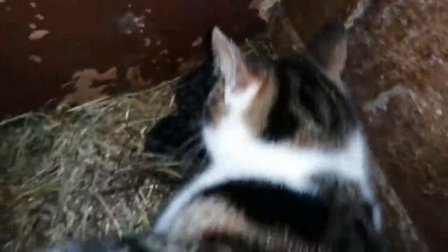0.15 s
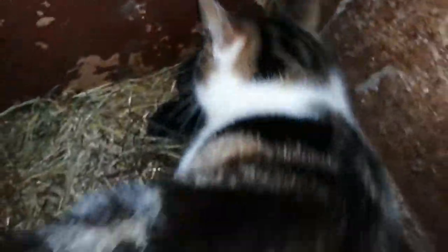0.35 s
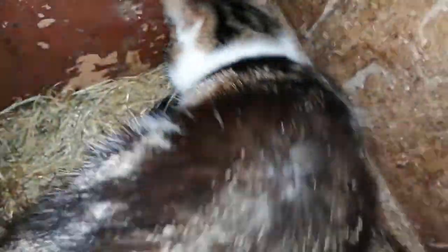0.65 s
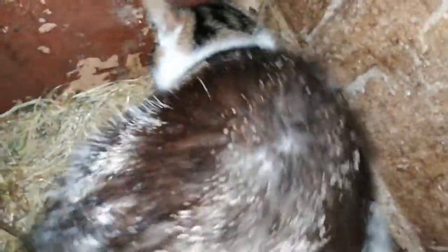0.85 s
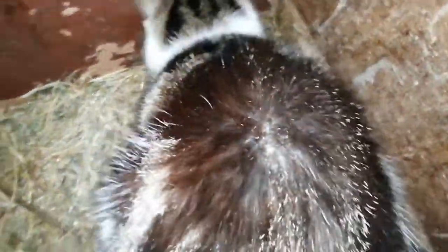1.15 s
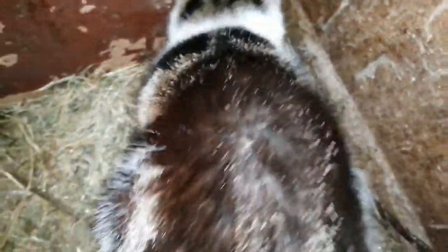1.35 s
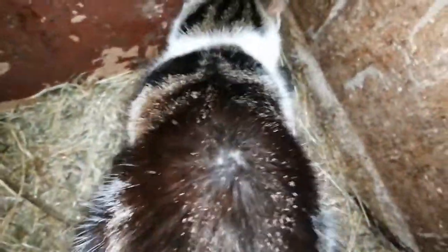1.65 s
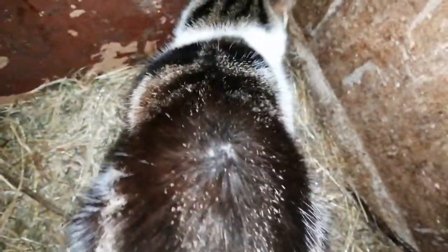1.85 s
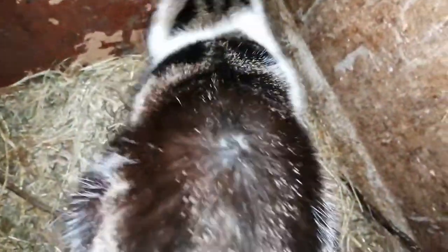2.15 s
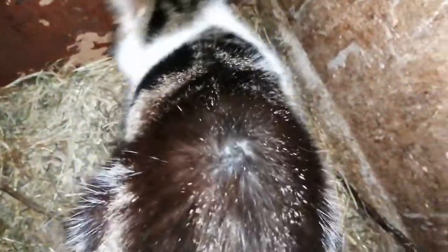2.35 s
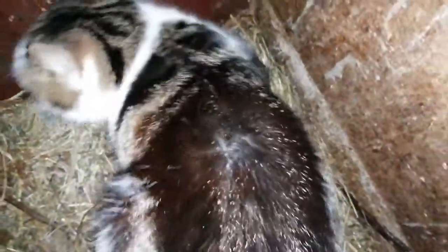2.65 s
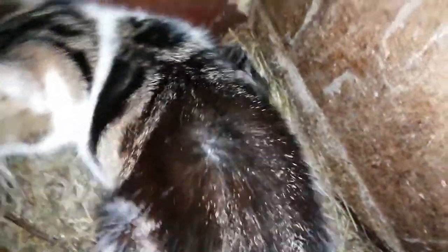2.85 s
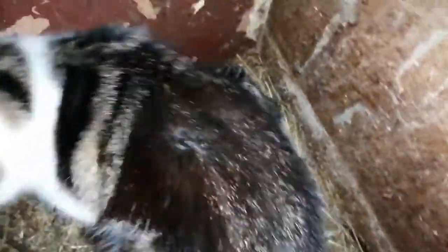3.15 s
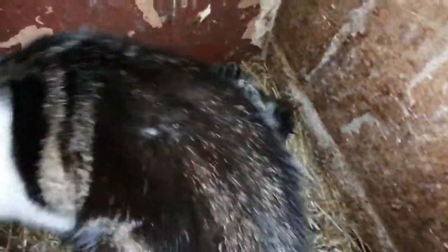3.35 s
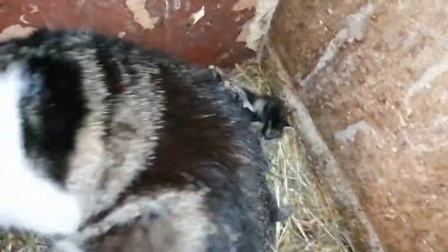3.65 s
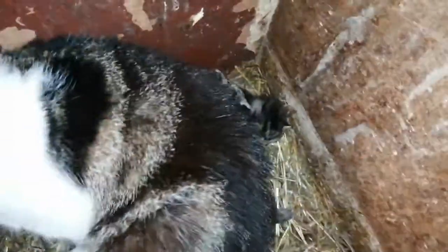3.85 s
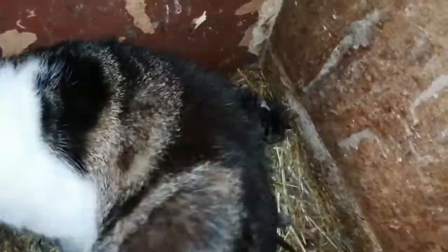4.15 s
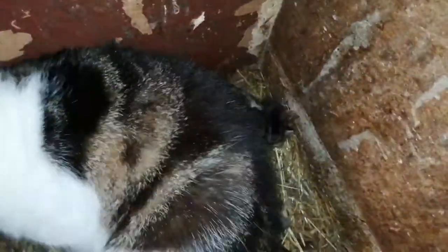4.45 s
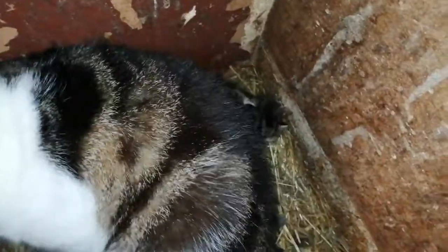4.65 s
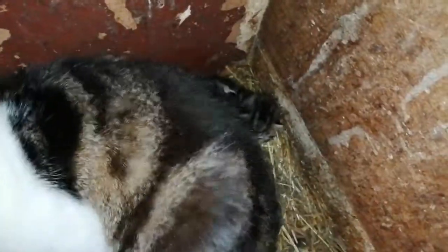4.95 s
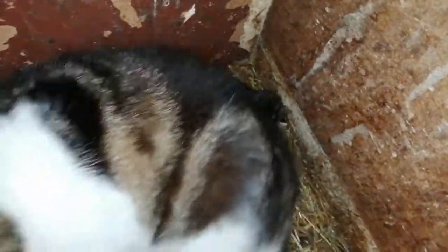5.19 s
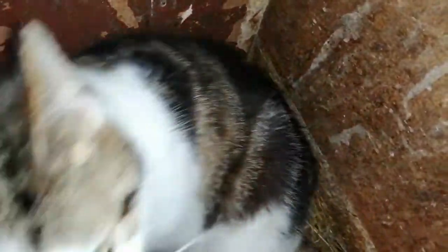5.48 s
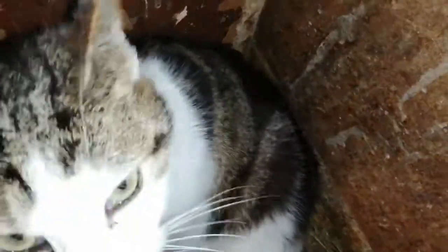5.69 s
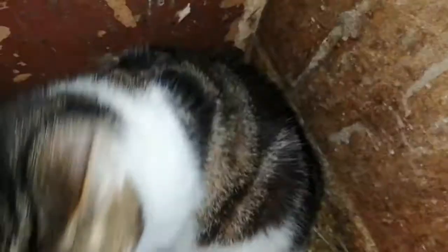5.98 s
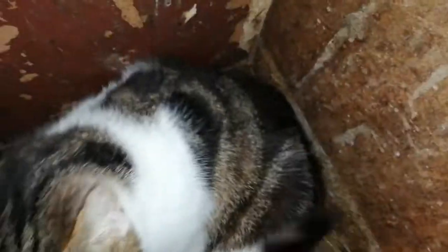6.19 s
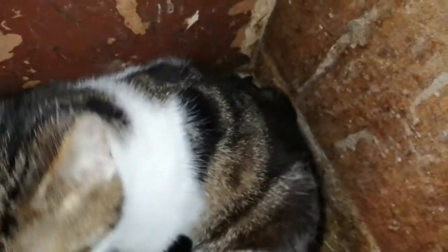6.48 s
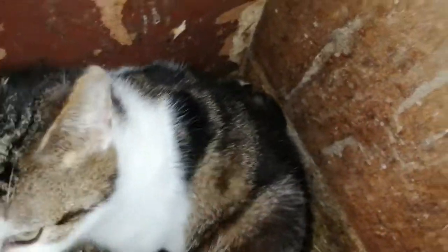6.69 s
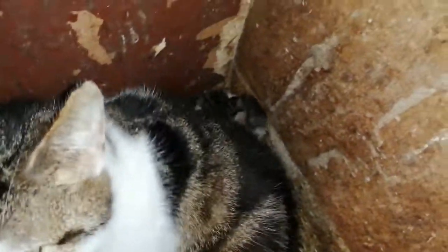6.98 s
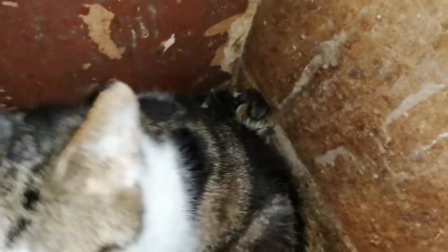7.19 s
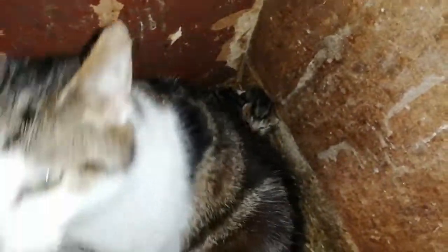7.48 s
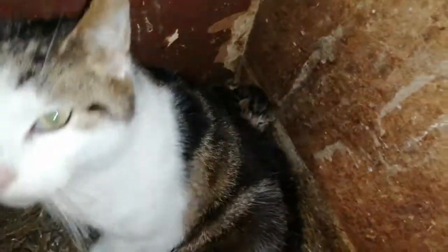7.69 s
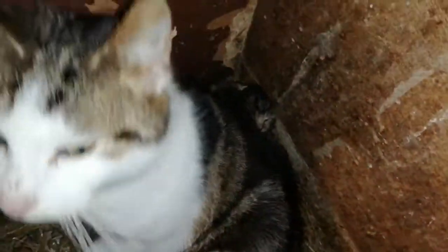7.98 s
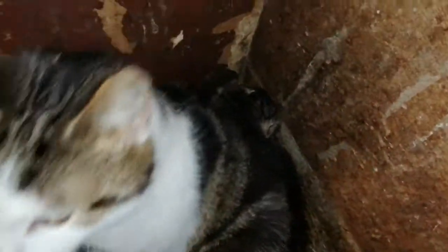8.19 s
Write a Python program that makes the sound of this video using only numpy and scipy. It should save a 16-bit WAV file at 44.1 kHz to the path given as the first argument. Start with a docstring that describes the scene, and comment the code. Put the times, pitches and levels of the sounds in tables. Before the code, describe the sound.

Close phone-like pickup in a straw-lined shed corner: soft continuous purring and crisp straw crackles first, then a cluster of shrill kitten mews, the loudest around three and a half seconds. Later mews are more spaced and gradually lower, with little rough squeaks, muffled body bumps and airy wheezes. The purr swells toward the end. Sound leans right at first, then becomes more balanced, with a very short stone reflection.

```python
"""Purring cat and mewing kittens

A mother cat purrs on straw in a stone shed, close to a phone, while her kittens mew over one another.
The purr is paired claps ringing chest and throat; each mew is a stack of partials on a gliding pitch.
Shaped noise makes the rustling, snapping straw, a faint band near 2.3 kHz, airy wheezes, hiss and rumble.
Bodies bump the ground as dull rings with low noise. The left channel starts quiet and fades up."""
import sys
import numpy as np
from scipy import signal
from scipy.fft import rfft, irfft, next_fast_len
from scipy.io import wavfile
from scipy.ndimage import uniform_filter1d

SR = 44100
rng = np.random.default_rng(int(sys.argv[2]) if len(sys.argv) > 2 else 0)


def waveform_to_disk(signal):
    """Save audio, clipped to [-1, 1], as 16-bit WAV at the path in sys.argv[1]."""
    frames = np.transpose(np.atleast_2d(signal))
    scaled = np.clip(frames, -1, 1) * 32767
    samples = np.round(scaled).astype(np.int16)
    wavfile.write(sys.argv[1], SR, samples)


N = 367353
TOP_HZ = 15850  # upper edge of the whole scene


def undb(db):
    """Turn decibels into an amplitude factor."""
    return 10 ** (np.asarray(db) / 20)


def unit(x):
    """Scale to an RMS of 1 over all channels together."""
    return x / np.sqrt(np.mean(x ** 2))


def band(x, hz, width):
    """Ring a resonance with gain 1 at its centre."""
    return signal.lfilter(*signal.iirpeak(hz, hz / width, fs=SR), x)


def colour(x, points):
    """Shape a spectrum through (Hz, dB) points, joined on a log frequency scale."""
    hz, db = np.transpose(points)
    size = next_fast_len(x.shape[-1])
    bin_hz = np.arange(size // 2 + 1) * SR / size
    gain = undb(np.interp(np.log(bin_hz + 1), np.log(hz), db))
    return irfft(rfft(x, size) * gain, size)[..., :x.shape[-1]]


def walk(count, size=N):
    """Wander between random levels, count of them a second, joined by straight slopes."""
    step = int(SR / count)
    levels = np.repeat(rng.standard_normal(size // step + 1), step)
    return 2.13 * uniform_filter1d(levels, step)[:size]


def sides(pan_db):
    """Left and right gains whose mean is 1, with left minus right given in dB."""
    return 2 * np.array([[undb(pan_db)], [1]]) / (1 + undb(pan_db))


def add(out, s, sound):
    """Mix a sound in at s seconds."""
    i = int(s * SR)
    out[:, i:i + sound.shape[1]] += sound[:, :N - i]


# Purring breaths, each lasting until the next.
# Each row: start in seconds, chest level in dB at the start and at the end, throat minus chest in dB.
BREATHS = [(0, -62.5, -71, -8), (1.15, -62.5, -59, -5), (1.68, -63.5, -66.5, -4), (2.6, -63, -65.5, -15),
           (3.431, -72, -56.5, -8.5), (4.15, -64.5, -59.5, -11.5), (5.38, -62.5, -63, -12),
           (6.059, -60, -56, -11.5), (7.319, -59, -67, -17), (7.72, -60, -53, -15.5),
           (8.17, -54, -53, -13.5)]
TURN_S, TURN_DB, ARCH_DB = 0.13, -7, 0.5  # the purr dips where the breath turns and swells in its middle


def breathing():
    """Chest level and throat-minus-chest level in dB as the breaths follow one another."""
    t = np.arange(N) / SR
    start, from_db, to_db, throat_db = np.transpose(BREATHS)
    end = np.append(start[1:], N / SR)
    breath = np.clip(np.searchsorted(start, t) - 1, 0, None)
    along = (t - start[breath]) / (end - start)[breath]
    chest_db = from_db[breath] + (to_db - from_db)[breath] * along + ARCH_DB * np.sin(np.pi * along)
    chest_db = chest_db + TURN_DB * sum(np.exp(-((t - s) / TURN_S) ** 2) for s in start[1:])
    # smooth the steps between breaths over 50 ms
    return [uniform_filter1d(db, size=SR // 20) for db in (chest_db, throat_db[breath])]


# Pulse rate of the purr. Each row: time in seconds, rate in Hz.
PURR_RATE = [(0, 27.61), (1.1, 27.78), (2.3, 29.22), (2.7, 28.22), (3.55, 28.6), (4.08, 29.43),
             (4.35, 28.19), (5.4, 30.07), (6.3, 28.62), (7.5, 30.5), (7.95, 29.54), (8.33, 28.07)]
REBOUND_MS = 7.83, 7.7  # mean delay of the second clap, at the start and at the end


def purr_claps():
    """The vocal folds clap once a cycle and rebound some 8 ms later, with uneven timing and force."""
    hz = np.interp(np.arange(N) / SR, *np.transpose(PURR_RATE))
    cycles = 0.3083 + np.cumsum(hz) / SR
    at = np.flatnonzero(np.diff(np.floor(cycles)))
    jitter, force, delay, rebound_force = rng.standard_normal((4, len(at)))
    at = np.abs(at + (0.0001 * SR * jitter).astype(int))
    rebound = np.linspace(*REBOUND_MS, len(at)) * (1 + 0.062 * delay) * SR / 1000
    claps = np.zeros(N + SR)
    claps[at] = undb(2.5 * force)
    claps[at + rebound.astype(int)] = undb(0.61 * rebound_force)
    # soft tissue: each clap lasts about 2 ms
    return np.convolve(claps, np.hanning(100))[:N]


# Body resonances; the first chest row rings at first, the second at last.
# Each row: centre in Hz, width in Hz, relative level in dB.
CHEST_RINGS = [(177.2, 128, 0), (130.6, 70, 0)]
THROAT_RINGS = [(402, 380, 0.7), (531, 250, 0)]


def purr():
    """The claps ring chest and throat, the chest crossfading from one resonance to the other."""
    claps = purr_claps()

    def ring(hz, width_hz, db):
        """Pass the claps twice through one resonance."""
        return undb(db) * unit(band(band(claps, hz, width_hz), hz, width_hz))

    fade = np.linspace(0, np.pi / 2, N)
    chest = np.cos(fade) * ring(*CHEST_RINGS[0]) + np.sin(fade) * ring(*CHEST_RINGS[1])
    throat = unit(sum(ring(*mode) for mode in THROAT_RINGS))
    chest_db, throat_db = breathing()
    return undb(chest_db) * (chest + undb(throat_db) * throat)


# Steady stirring of the straw. Each row: time in seconds, level in dB.
RUSTLE = [(0, -80), (2.5, -74.5), (4, -64), (8.33, -69)]
# A body shifts and the straw swells. Each row: time in seconds, level in dB.
SHUFFLES = [(0.034, -57), (.32, -67.5), (0.592, -62), (1.058, -59), (3.466, -51), (3.8, -69), (5.43, -54),
            (5.51, -66.5), (6.02, -56), (7.4, -56.5)]
# Colour of straw, for rubbing and snaps alike. Each row: frequency in Hz, relative level in dB.
STRAW_COLOUR = [(880, -67), (1500, -64), (2230, -9), (4300, -17), (6800, 2), (11000, -11), (14900, -3),
                (16000, -12)]


def straw():
    """Dense rubbing of stalks as grainy noise that swells when a body shifts, with stray ticks."""
    t = np.arange(N) / SR
    swell = undb(np.interp(t, *np.transpose(RUSTLE)))
    swell = swell + sum(undb(db) * np.exp(-((t - s) / 0.053) ** 2) for s, db in SHUFFLES)
    grain = rng.standard_normal((2, N)) * undb(1.51 * rng.exponential(size=(2, N)))
    flicker = undb(1.6 * walk(count=60))
    ticks = 0
    # about nine ticks a second ring in each band
    for hz in (5455, 7000, 9860, 14500):
        hits = (rng.random(N) < 9 / SR) * undb(21.5 + 10 * rng.random(N))
        ticks = ticks + band(hits, hz, hz / 3)
    ticks = ticks * [[.6], [1]]  # softer on the left
    return unit(colour(unit(grain) * flicker + ticks, STRAW_COLOUR)) * swell


# Steady hiss colour. Each row: frequency in Hz, relative level in dB.
HISS_COLOUR = [(450, -14), (750, -6), (3150, -8), (3900, -15.5), (6500, -11), (9000, -26), (13000, -23),
               (15000, -9.5)]
HISS_DB = -68
# Rumble. Each row: time in seconds, level in dB.
RUMBLE = [(0, -67), (3.799, -68), (5.2, -62), (8.33, -63.5)]


def air():
    """Steady hiss, unrelated left and right, over a wavering rumble that both sides mostly share."""
    hiss = unit(colour(rng.standard_normal((2, N)), HISS_COLOUR)) * undb(HISS_DB)
    low = rng.standard_normal(N) + .35 * rng.standard_normal((2, N))
    rumble_db = np.interp(np.arange(N) / SR, *np.transpose(RUMBLE)) + 0.867 * walk(count=4)
    rumble = unit(band(band(low, 53, 68.4), 42, 810)) * undb(rumble_db)
    return hiss + rumble


# Bands of soft noise: first a faint narrow band near 2.3 kHz, then broader airy wheezes.
# Each row: start in seconds, end in seconds, centre in Hz, width in Hz, level in dB before the fades.
NOISE_BANDS = [(0.1, 0.999, 2330, 246, -77.5), (2.692, 2.832, 1930, 900, -51),
               (4.441, 4.664, 1530, 834, -56.5), (4.978, 5.599, 1300, 699, -59)]


def noise_bands():
    """Noise through two resonances, fluttering and faded at both ends: a faint band, then airy wheezes."""
    out = np.zeros((2, N))
    for start, end, hz, width_hz, db in NOISE_BANDS:
        size = int((end - start) * SR)
        noise = rng.standard_normal((2, size))
        soft = unit(band(band(noise, hz, width_hz), hz, 2 * width_hz))
        flutter = undb(2.5 * walk(30, size))
        add(out, start, soft * np.sqrt(np.hanning(size)) * flutter * undb(db))
    return out


# Straw snapping. Each row: time in seconds, level in dB, centre in Hz.
CRACKS = [(1.05, -53, 7600), (1.07, -36, 7300), (1.1582, -44.5, 7500), (1.5204, -53.5, 3300),
          (1.6033, -39, 5874), (2.0225, -50.5, 6800), (4.6586, -39.5, 7100), (3.874, -43, 6486),
          (4.812, -52, 6560), (4.883, -54, 6296), (5.172, -55, 8600), (5.212, -48, 14500),
          (5.311, -54, 14300), (5.7415, -40.5, 8780), (6.605, -45.5, 1110), (6.6757, -38, 916),
          (6.739, -47.5, 2000), (6.877, -49.5, 6677), (7.8545, -45.5, 1309)]
SNAP_WIDTH_HZ = 1300


def snaps():
    """A snapping straw: a ringing burst with a short tail, and a sharp tick stronger in high snaps."""
    out, t = np.zeros((2, N)), np.arange(SR // 20) / SR
    for s, db, hz in CRACKS:
        burst = np.minimum(t / 0.0007, 1) * np.exp(-t / 0.00089) + 0.12 * np.exp(-t / 0.012)
        snap = band(rng.standard_normal(len(t)) * burst, hz, SNAP_WIDTH_HZ)
        tick = colour(rng.standard_normal(len(t)) * np.exp(-t / 0.00027), STRAW_COLOUR)
        snap = snap / np.abs(snap).max() + hz / TOP_HZ * tick / np.abs(tick).max()
        add(out, s, undb(db) * sides(-8.5) * snap / np.abs(snap).max())
    return out


# Mouth colour shared by all overtones. Each row: frequency in Hz, level in dB.
MOUTH_COLOUR = [(1000, 4), (2200, 5), (3400, 2.5), (4500, 5.5), (5500, 18), (7000, 13.5), (9500, 5.5),
                (14000, 9.5)]
MEW_LAG_MS = 0.043  # the left port is further from the kittens
LATE_DB, LATE_S = 5, .04  # high partials come in late and leave early: dB an octave of partials, time
GULP_S, GULP_BEFORE_END_S = 0.0045, 0.012


def mew(pitch, top_db, drop_db, swell_db, gulp_db, peak_hz, second_hz, dull_db, start_db, end_db,
        fall_db, pan_db, over_pan_db, rough):
    """Clean partials on a gliding pitch; roughness shakes pitch and size and so smears each line."""
    s, hz = np.transpose(pitch)
    t = np.arange(s[0], s[-1], 1 / SR)
    size = len(t)
    edge_s = np.minimum(t - s[0], s[-1] - t)  # time to the nearer end
    hz = uniform_filter1d(np.interp(t, s, hz), 500)
    below_top = np.log2(hz / hz.max())  # octaves, 0 or less
    # level follows pitch; the call swells or fades, and its level may jump or gulp at the close
    first_db = top_db + drop_db * below_top + swell_db * np.linspace(-.5, .5, size)
    first_db = first_db + gulp_db * np.exp(-((t - s[-1] + GULP_BEFORE_END_S) / GULP_S) ** 2)
    # the voice catches roughly and breaks up as it ends
    rough = rough + 0.33 * np.exp(-edge_s / 0.029)
    hz = hz * (1 + 0.03 * rough * walk(150, size) + 0.0012 * walk(30, size))
    phase = 2 * np.pi * (np.cumsum(hz) / SR - np.outer([MEW_LAG_MS / 1000, 0], hz))
    # the mouth opens or closes along the call, and the overtones follow part of the effort
    over_db = np.linspace(start_db, end_db, size) + 0.026 * (first_db - first_db.max())
    closing = 1 + 0.16 * np.linspace(.5, -.5, size)  # the resonances sink along the call
    mouth_hz, mouth_db = np.transpose(MOUTH_COLOUR)
    out = 0
    for k in range(1, 14):
        shake = 1 + np.clip(rough, 0, 1) * walk(250, size) * k ** 0.52
        if k == 1:
            gain = undb(first_db) * sides(pan_db)
        else:
            partial_db = over_db - fall_db * np.log2(k / 2) * 2
            partial_db = partial_db + np.interp(np.log(k * hz), np.log(mouth_hz), mouth_db)
            # each overtone sways in level, left and right apart
            partial_db = partial_db + 1.8 * np.array([walk(18, size), walk(18, size)])
            partial_db = partial_db + dull_db * np.log2(k) * below_top
            for f in (peak_hz, second_hz):
                partial_db = partial_db + 12 * np.exp(-(np.log(k * hz / f / closing) / 0.16) ** 2)
            partial_db = partial_db - LATE_DB * np.log2(k) * np.exp(-edge_s / LATE_S)
            gain = undb(partial_db) * (k * hz < TOP_HZ) * sides(over_pan_db)
        out = out + np.sqrt(2) * gain * shake * np.sin(k * phase)
    return out * np.clip(edge_s / .012, 0, 1)


NOOK_T60_S, NOOK_DB = .09, -17


def stone_corner(dry):
    """The short ring of the stone corner: a decaying noise tail, unrelated left and right."""
    t = np.arange(SR // 4) / SR
    tail = rng.standard_normal((2, len(t))) * 1000 ** (-t / NOOK_T60_S)
    tail = tail / np.sqrt(np.sum(tail ** 2, axis=1, keepdims=True))
    return undb(NOOK_DB) * signal.fftconvolve(dry.mean(axis=0)[None], tail, axes=1)[:, :N]


# Pitch of each mew, one list of points a mew. Each point: time in seconds, pitch in Hz.
MEW_PITCHES = [
    [(2.265, 844), (2.34, 1067), (2.445, 1468), (2.54, 1604), (2.575, 1783), (2.72, 1821), (2.76, 1714),
     (2.8, 1560)],
    [(2.8, 1450), (2.855, 2060), (2.885, 1983), (2.915, 2145), (2.97, 2080), (3.025, 1960), (3.07, 1714)],
    [(3.065, 984), (3.105, 1288), (3.215, 1571), (3.23, 1710), (3.28, 1866), (3.475, 1788), (3.665, 1603),
     (3.69, 1504), (3.75, 1081)],
    [(3.34, 1300), (3.425, 1610), (3.487, 2182), (3.51, 1946), (3.54, 1955), (3.56, 2093), (3.62, 1926),
     (3.775, 1693), (3.83, 1309), (3.86, 1317)],
    [(4.035, 791), (4.12, 1142), (4.245, 1373), (4.28, 1537), (4.315, 1565), (4.47, 1565), (4.525, 1438),
     (4.56, 1450), (4.625, 1150)],
    [(4.42, 1182), (4.44, 1140), (4.452, 922), (4.482, 795), (4.5, 553), (4.52, 701), (4.55, 705)],
    [(4.555, 529), (4.585, 550), (4.6, 397), (4.62, 426)],
    [(5.2, 1470), (5.225, 1716), (5.245, 1770)],
    [(5.31, 1045), (5.33, 864), (5.35, 990)],
    [(5.38, 940), (5.465, 918), (5.525, 987), (5.565, 860)],
    [(5.86, 1000), (5.885, 1061), (5.99, 1657), (6.085, 1742), (6.145, 1653), (6.165, 1434), (6.325, 1161),
     (6.38, 1220), (6.51, 477.7)],
    [(6.8, 486), (6.83, 722), (6.88, 678), (6.925, 724), (7.0, 967), (7.055, 928), (7.12, 530)],
    [(7.35, 729), (7.395, 994), (7.44, 1194), (7.51, 1369), (7.59, 1424), (7.69, 1111), (7.77, 592)],
    [(7.425, 852), (7.445, 975), (7.52, 986), (7.555, 1131), (7.655, 1159), (7.715, 994), (7.78, 888),
     (7.805, 650)],
    [(8.0, 570.5), (8.065, 558.5)],
]
# The voice of each mew, in the same order.
# Each row: fundamental in dB at the top pitch, dB lost an octave below the top, swell in dB from start
# to end, level change in dB at the close, two mouth resonances in Hz, dulling in dB an octave of partials
# an octave below the top, overtone level in dB at the start and at the end, fall in dB (a half octave
# of partials), left minus right in dB of the fundamental and of the overtones, base roughness from 0 to 1.
MEW_VOICES = [(-41.5, 34.5, -13.5, -6, 3325, 8070, 12.5, -52.5, -72.5, 7.5, -6.5, -6, 0.11),
              (-40.5, 31, 16.5, -1.5, 6500, 4970, 29, -43, -84.5, 13.3, -14, -9.5, 0.057),
              (-36, 40, 20.5, 20.5, 3130, 6670, 1.5, -52.5, -83, 4.45, -17.5, -10.5, 0.076),
              (-24, 44.5, 25.5, -33, 4320, 5250, 1, -62.5, -79.5, 3.15, -13.5, -4, 0.067),
              (-44, 13, 9, 4, 6310, 2800, 2, -60.5, -73, 4.8, -7, -8, 0.095),
              (-55.5, -4, -12, -7, 2400, 1600, -1, -67, -71, 6.7, -0.5, -11, 0.14),
              (-61.5, 22, -31, -15, 924, 2600, -5, -61, -66.5, 2.6, -3, -3, 0.057),
              (-50.5, 24, 2, 2, 3100, 5000, 0, -72, -86, 20, -12, -8, 0.02),
              (-57, 20, -3, -5, 1600, 2900, 2, -81.5, -71, 10, -3, -10, 0.63),
              (-49.5, 18, 8, 3, 1980, 2950, 11, -68, -74, 5, -0.5, -15, 0.1),
              (-44.5, 6.5, -10, 6, 2890, 4260, 6.5, -49, -63.5, 11.8, 11, -3.5, 0.14),
              (-48, 18.5, -2, 8, 1550, 3680, 5.5, -61.5, -67.5, 6.2, 5.5, -7, 0.1),
              (-43, 12.5, -5, 0, 2750, 8200, -5.5, -68.5, -71.5, 6.9, -1.5, 0.5, 0.08),
              (-55, -6, -0.5, -14, 1830, 2800, 5, -78.5, -66.5, 4.4, -0.5, -17, 0.16),
              (-60, 0, 1, 1, 840, 1830, -3, -75, -77, 9, -3, 2, 0.24)]


def kittens():
    """All the mews, some overlapping, with the ring of the stone corner around them."""
    out = np.zeros((2, N))
    for pitch, voice in zip(MEW_PITCHES, MEW_VOICES):
        add(out, pitch[0][0], mew(pitch, *voice))
    return out + stone_corner(out)


# Bodies bumping the ground. Each row: time in seconds, level of the ring in dB, centre in Hz.
BUMPS = [(2.713, -43, 239), (2.798, -52.5, 234), (5.129, -55.5, 410), (6.114, -43, 369),
         (7.336, -42.5, 230), (7.406, -48, 212), (7.856, -51, 213.4)]


def bumps():
    """A soft blow: a dull ring and a scatter of low noise."""
    out, t = np.zeros((2, N)), np.arange(SR // 5) / SR
    for s, db, hz in BUMPS:
        push = np.minimum(t / 0.00035, 1)
        ring = np.sin(2 * np.pi * hz * t) * np.exp(-t / 0.027)
        noise = rng.standard_normal(len(t))
        scatter = unit(band(band(noise, hz, 2 * hz), hz, 2 * hz)) * np.exp(-t / 0.038)
        add(out, s, (undb(db) * push * (ring + 0.68 * scatter))[None])
    return out


def scene():
    """Mother, litter and straw together."""
    return purr() + straw() + air() + noise_bands() + snaps() + kittens() + bumps()


# Left channel against the right. Each row: time in seconds, left minus right in dB.
LEFT_GAIN = [(2.7, -11), (3.099, -3), (3.6, -3.5)]


def record(dry):
    """The left channel fades up as the right eases back, their gains averaging 1; the top is cut."""
    left = undb(np.interp(np.arange(N) / SR, *np.transpose(LEFT_GAIN)))
    gain = np.array([left, np.ones(N)])
    top_cut = signal.ellip(10, .2, 80, TOP_HZ, fs=SR, output="sos")
    return signal.sosfilt(top_cut, dry * 2 * gain / gain.sum(axis=0))


dry = scene()
out = record(dry)
waveform_to_disk(out)
```